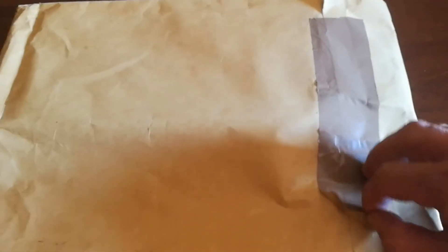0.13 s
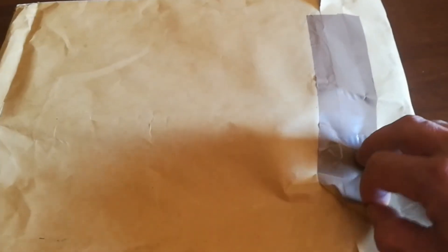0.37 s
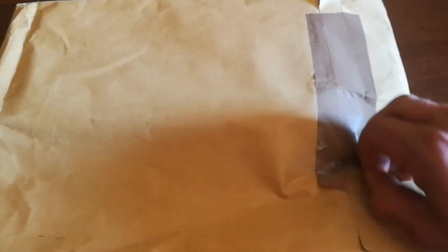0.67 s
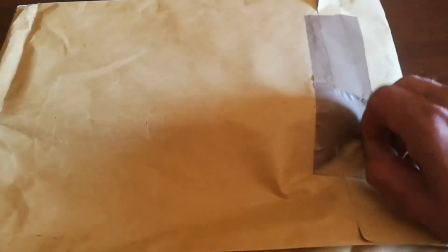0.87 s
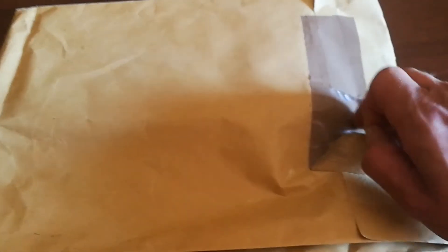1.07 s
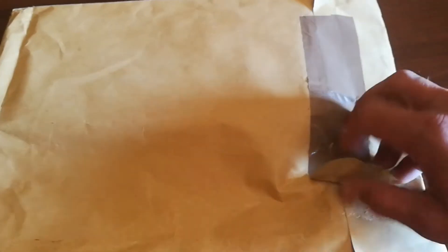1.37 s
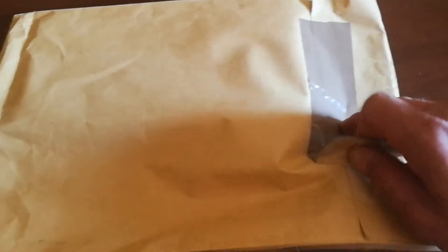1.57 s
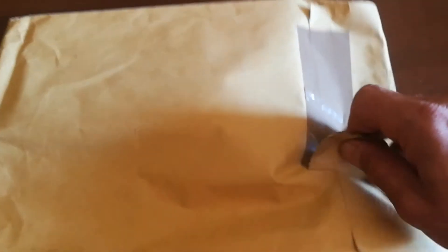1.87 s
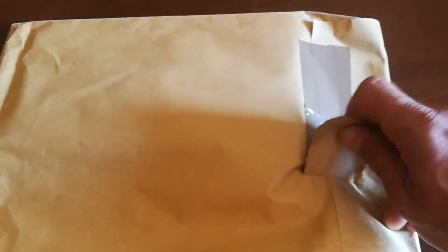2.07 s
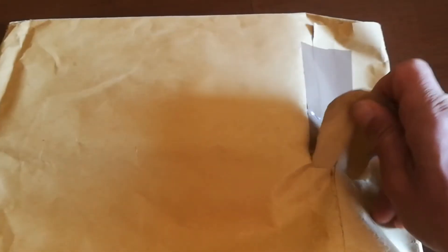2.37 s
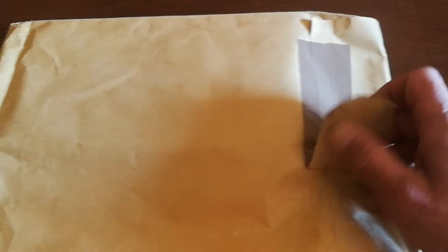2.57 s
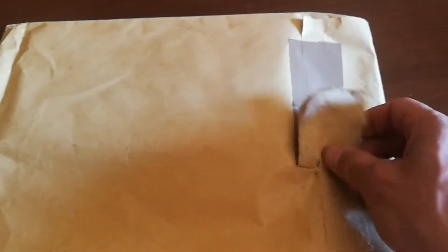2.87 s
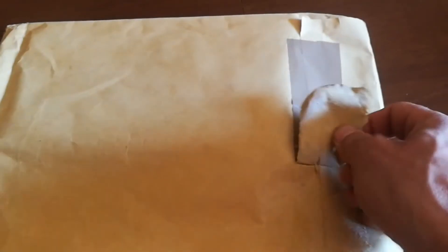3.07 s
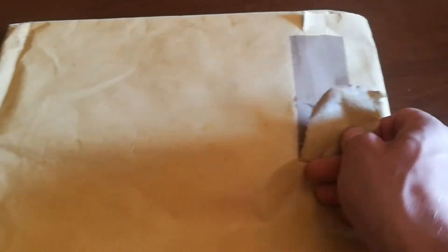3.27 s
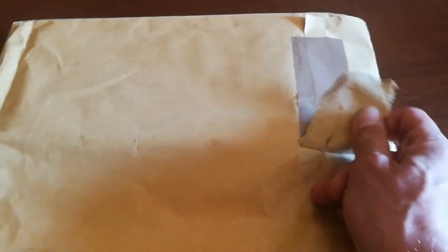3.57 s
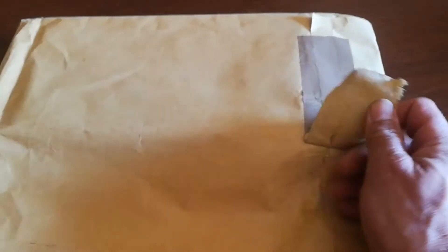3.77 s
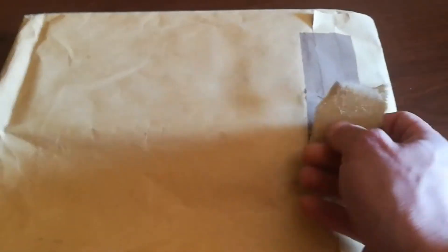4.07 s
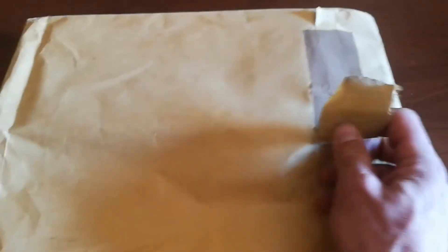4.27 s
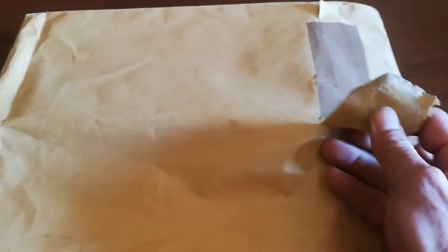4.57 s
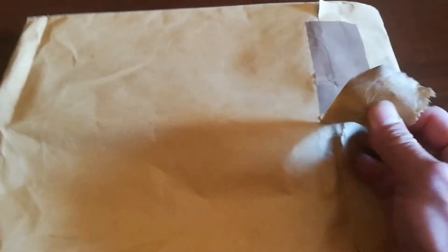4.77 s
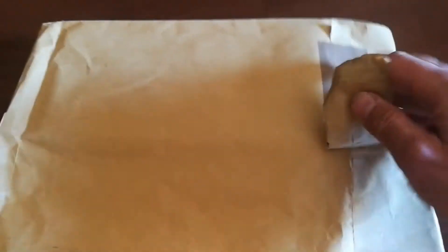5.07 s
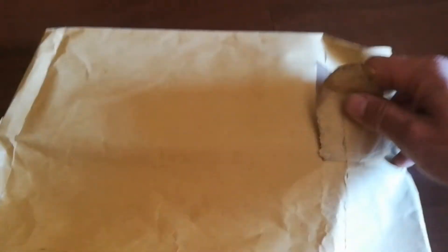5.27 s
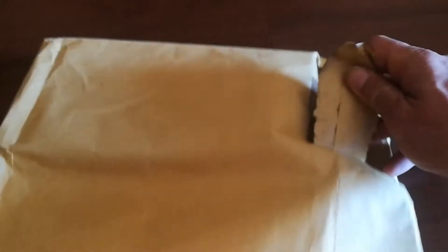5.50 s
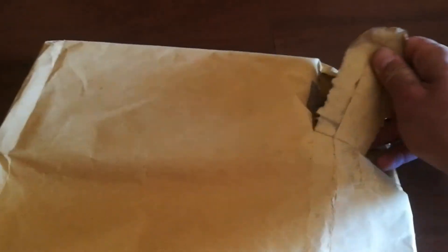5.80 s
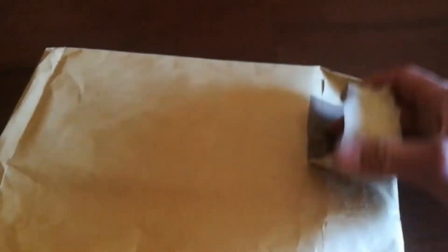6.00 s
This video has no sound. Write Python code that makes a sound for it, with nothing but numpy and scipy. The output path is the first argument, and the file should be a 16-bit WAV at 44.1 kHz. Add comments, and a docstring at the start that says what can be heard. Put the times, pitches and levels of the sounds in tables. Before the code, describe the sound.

Close phone pickup in a quiet room with low, soft room tone and a barely audible hum in the first second. A faint crackle opens, then from 0.4 to 0.8 s tape lets go in crisp, gritty bursts with bright fibre fizz. A hollow paper pop lands near 1.0 s, followed by a short lull. From 1.4 to 2.0 s the snaps are sharp and dense, the crackle at its strongest, fading into looser rustle until 2.4 s. Around 2.5 to 3.0 s it is nearly quiet. Loud cracks come at 3.1 to 3.2 s, smaller crinkles to 3.6 s, and a tiny thin squeak about 3.9 s. Light rustles and soft low bumps of bag and table follow from 4.0 to 4.8 s. From 5.0 s strong pops and tearing crackle return, with hard snaps near 5.7 s, dwindling by 6.1 s. Room reflections are brief.

```python
"""First a faint crackle over quiet room tone, then sharp papery snaps: a hand peels tape off a padded paper
envelope on a table, close to a phone. Glue and fibres let go as clumped random impulses that ring the sheet;
buckling panels ring as decaying sines and send a release into crease, fibres and bag.
Fingers push the bag and lean on the table, skin squeaks on the tape, and the walls answer briefly."""
import sys
import numpy as np
from scipy import signal
from scipy.fft import rfft, irfft, next_fast_len
from scipy.io import wavfile
from scipy.ndimage import uniform_filter1d, map_coordinates

SR = 44100
rng = np.random.default_rng(int(sys.argv[2]) if len(sys.argv) > 2 else 0)


def wav_out(sig):
    """Save sig, one row per channel (or a flat mono array), as 16-bit PCM at SR to the path in sys.argv[1]."""
    wavfile.write(sys.argv[1], SR, np.round(np.clip(np.atleast_2d(sig).T, -1, 1) * 32767).astype(np.int16))


N = 270774


def amp(db):
    """Decibel law: 20 dB is a tenfold amplitude."""
    return 10 ** (np.asarray(db) / 20)


def unit(x):
    """Normalisation to an rms of 1."""
    return x / np.sqrt(np.mean(x ** 2) + 1e-20)


def along(points, hz):
    """Interpolation of (Hz, value) points on a logarithmic frequency axis."""
    point_hz, values = np.transpose(points)
    return np.interp(np.log(hz + 1), np.log(point_hz + 1), values)


def curves(rows):
    """Linear interpolation in time: one value per sample for each column after the seconds."""
    seconds, *columns = np.transpose(rows)
    return [np.interp(np.arange(N) / SR, seconds, column) for column in columns]


def wobble(rate):
    """Slow random modulation: a smooth curve through rate random knots a second."""
    knots = rng.standard_normal(int(N * rate / SR) + 4)
    return map_coordinates(knots, [np.arange(N) * rate / SR])


def filtered(x, response):
    """Linear filtering: the spectrum of x times a response of frequency."""
    m = next_fast_len(N + SR // 2)
    hz = np.fft.rfftfreq(m, 1 / SR)
    return irfft(rfft(x, m) * response(hz), m)[..., :N]


def ring(x, modes, skirt_hz):
    """Modal resonance: parallel band-passes of alternating sign, high-passed, with mean power gain 1."""
    def response(f):
        gain = 0
        for k, (centre, width, db) in enumerate(modes):
            band = 1j * f * width / (centre * centre - f * f + 1j * f * width)
            gain = gain + (-1) ** k * amp(db) * band
        gain = gain * (1j * f / (skirt_hz + 1j * f)) ** 2
        return gain / np.sqrt(np.mean(np.abs(gain) ** 2))
    return filtered(x, response)


def bursts(sizes, life_s):
    """Exponential decay: each impulse becomes a dying puff of noise, in two unrelated versions."""
    keep = np.exp(-1 / (life_s * SR))
    envelope = signal.lfilter([1], [1, -keep], sizes)
    return envelope * rng.standard_normal((2, N))


def slips(rate, spread_db, clump_db):
    """Stick-slip: irregular releases, rate a second on average, of scattered size that swells in clumps."""
    sizes = amp(spread_db * rng.standard_normal(N) + clump_db * wobble(45))
    return sizes * (rng.random(N) < rate / SR)


# Tugs at the tape. Each row: start in seconds, length in seconds, glue crackle in dB before the sag and
# the added settling, paper rustle in dB relative to the crackle, fibre fizz in dB relative to the crackle.
TUGS = [(-.03, 0.11, -64.5, -4, -3), (0.108, 0.054, -51.5, 3.5, -1.5), (0.3, 0.24, -57.5, -24, 7),
        (0.402, 0.045, -38.5, -12, 4), (0.454, 0.031, -30, -12.5, 1), (0.507, 0.038, -33.5, -13, -1),
        (0.564, .15, -33, -7.5, -2), (.72, 0.055, -34.5, -1.5, -1), (0.844, .06, -48.5, -2.5, -11.5),
        (0.945, 0.056, -43, -4, -1), (1.004, 0.084, -52.5, 9.5, -25), (1.266, 0.041, -54, -9, -10),
        (1.371, 0.024, -42, 7.5, -5.5), (1.436, 0.04, -37, 4.5, 0.5), (1.505, 0.022, -29.5, -11, -3),
        (1.56, 0.026, -38, 1, -9), (1.717, .03, -36, -11, 3.5), (1.737, 0.042, -27, -6.5, -4),
        (1.805, 0.046, -34.5, 1, -6), (1.839, 0.045, -26, -3.5, -0.5), (1.962, 0.13, -36.5, -1, 2.5),
        (2.096, 0.14, -43.5, 0.5, 2.5), (2.243, 0.06, -38.5, 1.5, -1), (2.369, 0.049, -51, 7, 3),
        (2.583, .03, -50, 0, 1), (2.64, 0.023, -46, -5, 1), (2.751, .11, -60, -11, 8),
        (2.942, 0.12, -68.5, -1, 7), (3.029, 0.073, -61, 10, 2), (3.116, 0.067, -50, 7.5, 2),
        (3.17, 0.12, -41, -7.5, -9), (3.287, 0.094, -37.5, -2, -3), (3.367, 0.1, -51.5, 11, 3.5),
        (3.447, 0.031, -51.5, 8, 1.5), (3.507, 0.02, -43.5, 5.5, -5), (3.624, 0.11, -49, 2, 0),
        (3.761, 0.096, -60, 9.5, 4), (3.881, 0.079, -64.5, 15.5, -10), (4.034, 0.064, -43, 4, 0.5),
        (4.129, 0.13, -44, 6, 1.5), (4.21, .1, -47.5, -6, -2.5), (4.335, 0.14, -51, -3.5, 4),
        (4.487, 0.017, -39.5, -1, -6), (4.552, 0.09, -40, 2, 3.5), (4.67, 0.14, -50, 6.5, -4),
        (4.919, 0.067, -75.5, 23.5, -8.5), (5.012, 0.19, -47, 6, -2), (5.16, 0.057, -43, 1.5, -4),
        (5.204, 0.052, -34, 6.5, -7), (5.266, 0.082, -31.5, 3.5, 2), (5.358, 0.17, -33, 1, 0),
        (5.48, 0.2, -39, 3, 2), (5.735, 0.094, -41.5, -1.5, -12.5), (5.838, 0.072, -51, -4, -5),
        (5.965, .04, -58.5, 10, -11), (6.044, 0.13, -61, 0, 7)]
RISE_S, SAG_DB_PER_S, LET_GO_DB_PER_S = 0.033, 27.5, 400  # a tug swells, tires while held, lets go
SETTLE_DB, SETTLE_DB_PER_S = -3, [[112], [114], [130]]  # settling rates of rustle, crackle and fizz


def effort():
    """Addition of powers: tugs swell, sag, let go and settle, giving rustle, crackle and fizz levels in dB."""
    t, power = np.arange(0, N / SR + .002, .001), 1e-9
    for start, length, db, rustle_db, fizz_db in TUGS:
        swell = np.clip((t - start) / min(RISE_S, length), 0, 1)
        after = np.maximum(t - start - length, 0)
        held_db = db - SAG_DB_PER_S * np.clip(t - start, 0, length)
        let_go = amp(-LET_GO_DB_PER_S * after) ** 2
        settling = amp(SETTLE_DB - np.multiply(SETTLE_DB_PER_S, after)) ** 2
        shape = (swell * amp(held_db)) ** 2 * (let_go + settling)
        power = power + shape * amp([[rustle_db], [0], [fizz_db]]) ** 2
    return [np.interp(np.arange(N) / SR, t, 10 * np.log10(row)) for row in power]


# Resonances of the paper sheet. Each row: centre in Hz, width in Hz, relative level in dB.
SHEET = [(763, 224, -3.5), (968, 290, -3.5), (1310, 196, -2), (1850, 560, -8.5)]
# Resonances of the creases. Each row: centre in Hz, width in Hz, relative level in dB.
CREASE = [(2330, 1280, 2), (3410, 1670, 2.5), (5020, 1300, -5)]
# Resonances of the paper fibres. Each row: centre in Hz, width in Hz, relative level in dB.
FIBRE = [(5420, 1830, -3.5), (10000, 3030, -6.5), (12520, 5000, -12)]


def peeling():
    """Stick-slip release of glue and fibre excites resonances: sheet rustle, crease crackle, fibre fizz."""
    rustle_db, crackle_db, fizz_db = effort()
    shared = unit(slips(rate=620, spread_db=0.5, clump_db=1.0))
    sheet_slips = 0.82 * shared + unit(slips(rate=640, spread_db=0.0, clump_db=4.5))
    crease_slips = 2.2 * shared + unit(slips(rate=3000, spread_db=3.0, clump_db=0.0))
    fibre_slips = 0.85 * shared + unit(slips(rate=2700, spread_db=6.0, clump_db=4.5))
    rustle = ring(bursts(sheet_slips, life_s=0.00098), SHEET, skirt_hz=630)
    crackle = ring(bursts(crease_slips, life_s=0.0045), CREASE, skirt_hz=2000)
    fizz = ring(bursts(fibre_slips, life_s=0.0033), FIBRE, skirt_hz=5800)
    # single fibres part with a dry tick, far shorter than the glue's puffs
    parting = bursts(slips(rate=700, spread_db=5, clump_db=2.5), life_s=.00015)
    crackle = unit(crackle) + .75 * unit(ring(parting, CREASE, skirt_hz=1500))
    fizz = unit(fizz) + .7 * unit(ring(parting, FIBRE, skirt_hz=4500))
    return amp(rustle_db) * unit(rustle) + amp(crackle_db) * unit(crackle) + amp(fizz_db) * unit(fizz)


# Buckling snaps. Each row: release time in seconds, panel ring in dB, ring pitch in Hz that the mode ratios
# multiply, crease crack in dB, fibre tick in dB, bag thump in dB; all levels are before the gains below.
SNAPS = [(0.1389, -30.5, 1220, -30, -31.5, -47), (0.2385, -58, 1110, -63, -70, -40.5),
         (0.2939, -61, 1540, -32.5, -16, -77), (0.4107, -29.5, 1230, -19, -23.5, -68),
         (0.44, -33.5, 900, -18.5, -30.5, -68), (0.4535, -33, 905, -27, -19.5, -67),
         (0.4775, -30, 1310, -25, -28, -51), (0.501, -49, 1890, -35, -29, -59),
         (0.5143, -29, 1420, -24, -28, -58), (0.524, -35, 1770, -13, -22, -61),
         (0.5318, -32, 1280, -28, -28, -49), (0.606, -37, 1770, -25, -17.5, -69),
         (0.6861, -23, 1970, -34, -38, -32), (0.729, -36, 1790, -23, -29, -62),
         (0.754, -26, 1950, -29, -21.5, -38.5), (0.788, -26.5, 1350, -19, -19, -39),
         (0.9114, -37, 1950, -29, -20, -76), (0.9309, -32, 1940, -31, -48, -33.5),
         (0.9541, -29, 1260, -50, -60, -40), (1.0359, -18, 1345, -22, -53, -24.5),
         (1.0409, -27, 1320, -22, -47, -29.5), (1.3054, -49, 1290, -22, -38, -65),
         (1.324, -55, 1310, -38, -53, -74), (1.3352, -58, 1310, -33, -36, -78),
         (1.3718, -27.5, 1740, -25.5, -47.5, -43), (1.392, -17, 1410, -16.5, -44, -39),
         (1.4305, -27, 840, -23, -22, -53), (1.4519, -19, 1360, -16, -46, -29),
         (1.4658, -16, 1320, -15, -22.5, -23.5), (1.4743, -17, 884, -29, -43, -55.5),
         (1.5378, -31, 1260, -20, -12.5, -46), (1.5708, -11.5, 1366, -14.5, -31.5, -37),
         (1.656, -52, 1510, -36, -26, -70), (1.7645, -23, 1310, -11, -11, -61),
         (1.8248, -20, 1960, -15, -8, -52.5), (1.8765, -21, 866, -12.5, -22, -47),
         (1.982, -33, 1270, -24, -20, -63), (2.1934, -20, 1020, -39, -45, -60),
         (2.1966, -19.5, 1416, -36, -51, -63), (2.2066, -24, 990, -42, -45, -46),
         (2.234, -28, 1270, -33, -53.5, -49), (2.331, -43, 1890, -26, -21.5, -57),
         (2.3586, -23.5, 1460, -28, -65, -32.5), (2.5027, -41, 1310, -56, -37, -36),
         (2.594, -52, 1390, -31.5, -15.5, -48), (2.6583, -39, 980, -24, -19.5, -53.5),
         (2.664, -39.5, 1450, -23, -25.5, -67), (2.7212, -45, 1330, -35, -53, -57),
         (2.76, -45.5, 1240, -42, -42, -70), (3.0255, -39.5, 1270, -67, -42, -42),
         (3.077, -28.5, 1320, -29.5, -27.5, -40), (3.1319, -13.5, 1440, -4.5, -30, -46),
         (3.2044, -18, 1290, -12, -13, -30.5), (3.2109, -31, 1460, -11.5, -46.5, -42),
         (3.2184, -13, 1430, -29, -40.5, -57), (3.4249, -28, 1270, -38, -46.5, -33),
         (3.4413, -26, 1530, -37, -42, -33.5), (3.461, -22, 1360, -31, -55, -49),
         (3.4705, -37, 1690, -17, -44, -48), (3.4739, -24.5, 1260, -33, -51, -38),
         (3.5162, -28, 1255, -27, -49, -59), (3.5268, -38, 1470, -33, -41.5, -39),
         (3.699, -38, 1300, -24.5, -57, -40), (3.7704, -31.5, 1260, -62, -63, -44),
         (3.931, -50, 1510, -46, -52, -70), (3.9956, -39, 960, -32, -38, -63),
         (4.008, -30, 1060, -31, -41, -54), (4.064, -28.5, 1370, -41, -26, -62),
         (4.0893, -24, 1360, -41, -40.5, -38), (4.1605, -23, 1520, -27, -14.5, -56),
         (4.3675, -57, 1170, -41, -31, -77), (4.386, -55, 1850, -32, -25, -79),
         (4.4437, -42.5, 1170, -35, -23, -74), (4.5099, -31, 1740, -22, -47, -44),
         (4.5652, -35, 800, -20.5, -20.5, -53), (4.617, -23.5, 790, -16, -31.5, -52),
         (4.6849, -18, 1280, -18, -48, -63), (4.7802, -30, 1340, -30, -51, -73.5),
         (5.0096, -17, 1310, -26.5, -60, -35.5), (5.0335, -31, 1850, -32, -51, -42),
         (5.036, -24, 1420, -24, -30, -45), (5.0408, -12, 1370, -13.5, -25, -31.5),
         (5.073, -32, 1260, -32, -44, -51), (5.1324, -20.5, 886, -20, -45, -51),
         (5.1364, -13, 1340, -7.5, -32, -42), (5.1743, -13, 1350, -18, -28, -43),
         (5.2241, -31.5, 960, -25, -56, -31), (5.249, -21, 845, -13, -40, -58),
         (5.3097, -18, 1520, -29, -27, -53), (5.4803, -14, 1420, -32, -36, -34),
         (5.6888, -10.5, 1350, -10, -31, -52), (5.744, -13, 1310, -11, -8.5, -31),
         (5.7685, -25.5, 920, -21, -45, -44), (5.9755, -28, 1380, -30, -55, -65),
         (5.9957, -37, 870, -52, -74, -36)]
# Modes of a buckled panel. Each row: pitch ratio, relative level in dB, time to fall 60 dB in seconds.
PANEL = [(1.007, 3, 0.011), (0.587, -11, 0.015), (1.315, -2, 0.01), (1.124, -5, 0.011)]
# Resonances of the padded bag. Each row: centre in Hz, width in Hz, relative level in dB.
BAG = [(139, 57, 0.0053), (244, 71, 0.022), (390, 108, 0.019)]
# Bodies struck by a snap. Each row: modes, skirt in Hz, top in Hz, puff life in seconds, coupling in dB.
BODIES = [(CREASE, 1500, 9000, .0006, -2), (FIBRE, 3500, 30000, .001, -6), (BAG, 90, 1200, .002, 2.5)]


def snaps():
    """Buckling instability: each panel rings in its modes and a release strikes crease, fibres and bag."""
    s, ring_db, ring_hz, *body_db = np.transpose(SNAPS)
    start, t = np.round(s * SR).astype(int), np.arange(SR // 25) / SR
    chance = rng.standard_normal((len(s), len(PANEL) + 1, 1))
    aside = np.tanh(chance[:, -1])  # each buckle lies somewhere else on the sheet
    scatter_db = 1.8 * chance  # no two buckles strike the modes alike
    rings = 0
    for k, (ratio, db, t60) in enumerate(PANEL):
        decay = amp(db + scatter_db[:, k] - 60 * t / t60)
        rings = rings + decay * np.sin(2 * np.pi * ratio * ring_hz[:, None] * t)
    onset = (1 - np.exp(-t / 0.0009)) ** 2
    rings = rings * amp(ring_db + 7.0)[:, None] * onset
    # the panel swings up 0.8 ms before the crack
    place = (start[:, None] - round(.0008 * SR) + np.arange(len(t))).ravel()
    shares = (1.2, .9 * aside)
    out = np.array([np.bincount(place, (share * rings).ravel(), N + SR)[:N] for share in shares])
    for db, (modes, skirt_hz, top_hz, life_s, coupling_db) in zip(body_db, BODIES):
        strength = amp(db + coupling_db)
        sizes = np.bincount(start, strength, N)
        step = np.array([sizes, np.bincount(start, 0.39 * aside[:, 0] * strength, N)])
        # a short noise swells up into each snap, softening its attack
        lead_in = amp(-11) * bursts(sizes[::-1], life_s=.0018)[:, ::-1]
        blow = 3.44 * step + 0.64 * bursts(sizes, life_s) + lead_in
        softened = filtered(blow, lambda f: (1 + 1j * f / top_hz) ** -2)
        out = out + ring(softened, modes, skirt_hz)
    return out


# Skin rubbing the tape. Each row: time in seconds, level in dB before the gains below, pitch in Hz
# about which the tone wanders.
SQUEAK = [(3.78, -62, 1470), (3.784, -62, 1460), (3.92, -44.5, 1460), (3.962, -62, 1555),
          (3.978, -69, 1390), (3.99, -56, 1420)]


def squeak():
    """Frictional self-oscillation: skin sticks and slips on the film, a narrow tone of unsteady pitch."""
    db, hz = curves(SQUEAK)
    t = np.arange(N) / SR
    rubbing = (t > SQUEAK[0][0]) & (t < SQUEAK[-1][0])
    tone = np.sin(2 * np.pi * np.cumsum(hz + 45 * wobble(120)) / SR)
    return rubbing * amp(db + 1.5 + 3 * wobble(70)) * tone * [[1.3], [.5]]


# Resonances of the table. Each row: centre in Hz, width in Hz, relative level in dB.
TABLE = [(38, 17, 6), (78, 48, 3.5)]
# The hand leans on the table. Each row: time of the peak in seconds, rumble in dB.
LEANS = [(.46, -58), (.6, -56), (1.03, -47), (1.14, -61), (1.46, -44.5), (1.881, -50), (3.48, -62),
         (4.13, -43.5), (4.25, -43.5), (4.29, -49), (4.33, -63.5), (4.47, -55), (5.04, -47), (5.3, -58),
         (5.52, -49), (5.78, -70)]
LEAN_IN_DB_PER_S, LEAN_OUT_DB_PER_S = 900, 301
# How hard the fingers hold the bag. Each row: time in seconds, change of flex level in dB.
GRIP = [(0, 1.5), (1, -7.5), (1.7, -6.5), (2.4, -1), (2.9, -4), (3.8, 7), (4.2, 0), (4.4, -8), (4.65, 2),
        (4.9, 6.5), (5.1, 4.5), (5.5, 2.5), (6.14, 5)]
FLEX_DB, FLEX_GROWS = -30.5, 0.6  # dB, and dB per dB of rustle
SHAKE_DB, SHAKE_GROWS = -55.5, 0.32  # dB, and dB per dB of rustle


def fingers():
    """Forced vibration: soft lumpy pushes drive bag and table, harder with the rustle, grip and leaning."""
    rustle_db = uniform_filter1d(effort()[0], SR // 20)  # smoothed over 50 ms
    t = np.arange(N) / SR
    leaning = 0
    for s, db in LEANS:
        fall_db = np.maximum(LEAN_IN_DB_PER_S * (s - t), LEAN_OUT_DB_PER_S * (t - s))
        leaning = leaning + amp(db - fall_db)
    flex = ring(bursts(slips(rate=300, spread_db=1.0, clump_db=5.5), life_s=0.02), BAG, skirt_hz=150)
    rumble = ring(bursts(slips(rate=210, spread_db=1.5, clump_db=2.5), life_s=0.015), TABLE, skirt_hz=28)
    flex_db = FLEX_DB + FLEX_GROWS * rustle_db + curves(GRIP)[0] + 3.7 * wobble(7)
    shake = amp(SHAKE_DB + SHAKE_GROWS * rustle_db)
    return amp(flex_db) * unit(flex) + (shake + leaning) * unit(rumble)


# Decay of the room's answer. Each row: frequency in Hz, time to fall 60 dB in seconds.
WALLS = [(200, 0.47), (1500, 0.18), (5000, 0.24), (14000, 0.31)]


def walls(pair, count=4):
    """Reverberation: noise tails, each frequency dying at its own speed, in patterns that rotate every 25 ms."""
    noise = rng.standard_normal((count, 2, SR // 3))
    hz, t, z = signal.stft(noise, SR, nperseg=256)
    decay = amp(-60 * t / along(WALLS, hz)[:, None])
    tails = signal.istft(z * decay, SR, nperseg=256)[1]
    late = np.pad(pair[0], (round(.002 * SR), 0))[:N]  # table and room answer after 2 ms
    turn = np.arange(N) // (SR // 40) % count
    answer = 0
    for k, tail in enumerate(tails):
        kernel = tail / np.linalg.norm(tail[0])
        answer = answer + signal.fftconvolve([late * (turn == k)], kernel, axes=1)[:, :N]
    return answer


# Spectrum of the room tone. Each row: frequency in Hz, relative density in dB per Hz.
ROOM_TONE = [(18, -43), (30, -12), (165, -5), (569, -34), (684, -1), (6050, -12), (8080, -16), (9710, -33),
             (16000, -64)]
# A faint wavering hum. Each row: time in seconds, level in dB before the wobble and channel gain below.
HUM = [(0, -66), (.25, -62), (.3, -70), (.4, -61), (.65, -67.5), (1.2, -97)]


def background():
    """Stationary noise and a frequency-modulated sine: room tone and a faint hum near 186 Hz."""
    noise = rng.standard_normal((2, N))
    tone = unit(filtered(noise, lambda hz: amp(along(ROOM_TONE, hz))))
    hum_hz = 186 + 4 * wobble(24)
    hum_level = amp(curves(HUM)[0] + 2.6 * wobble(25))
    hum = hum_level * np.sin(2 * np.pi * np.cumsum(hum_hz) / SR)
    return amp(-70.5) * tone + hum * [[1.4], [0]]


# Likeness of the two ports. Each row: frequency in Hz, left-right correlation from -1 to 1.
ALIKE = [(60, 0.95), (130, 1), (290, 0.71), (640, 0.08), (1300, 0.82), (2500, 0.13), (5000, 0.19),
         (9000, -0.11), (15000, 0.1)]
# Balance of the two ports. Each row: frequency in Hz, left minus right in dB.
LEFT_DB = [(60, -0.5), (600, 1), (2000, -0.5), (5000, 0), (7000, 1), (9500, 5.5), (12000, 6), (15000, 2)]


def ports(pair):
    """Interaural-style coherence: two versions mix as sum and difference, then each band is balanced."""
    def sum_and_difference(hz):
        angle = np.arccos(np.clip(along(ALIKE, hz), -1, 1)) / 2
        return np.sqrt(2) * np.array([np.cos(angle), np.sin(angle)])

    mid, side = filtered(pair, sum_and_difference)
    both = np.array([mid + side, mid - side]) / np.sqrt(2)
    return filtered(both, lambda hz: amp(along(LEFT_DB, hz) / 2 * np.array([[1], [-1]])))


def scene():
    """Superposition: envelope, hand and room add up at the two ports."""
    paper = snaps() + peeling() + squeak()
    return ports(paper + amp(-6.5) * walls(paper) + fingers() + background())


TOP_HZ = 15900


def record(dry):
    """Band limitation: the phone keeps nothing from its top frequency upward."""
    return filtered(dry, lambda hz: hz < TOP_HZ)


dry = scene()
out = record(dry)
wav_out(out)
```